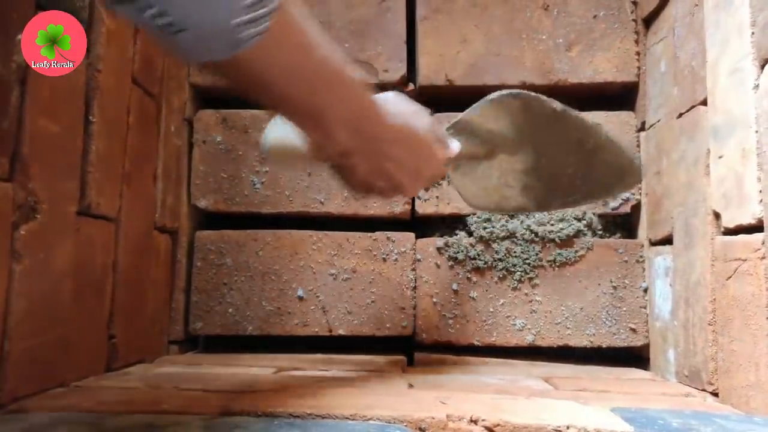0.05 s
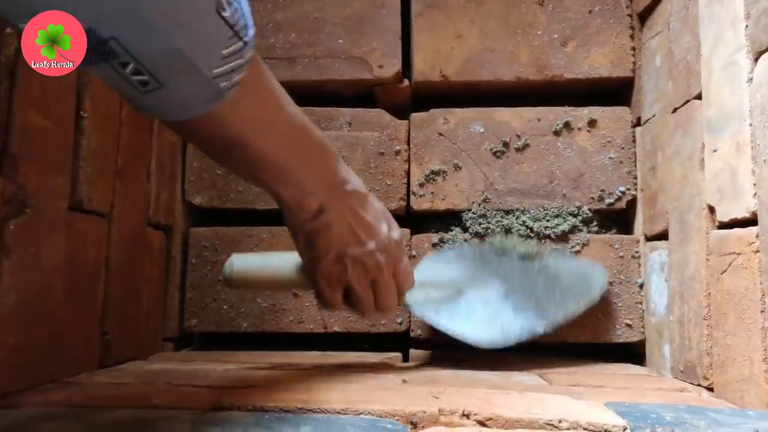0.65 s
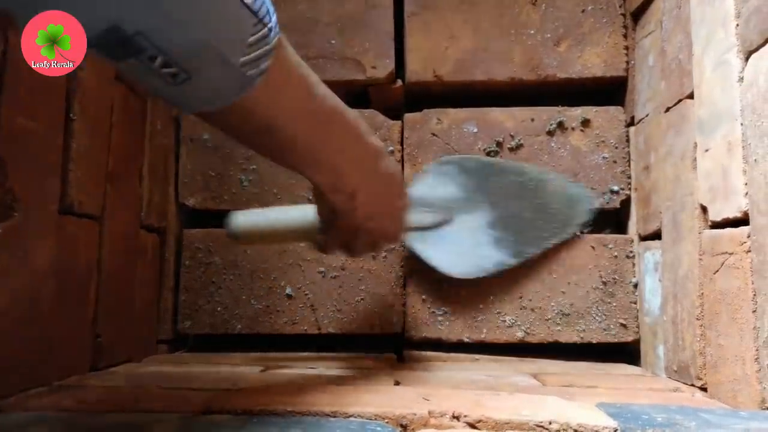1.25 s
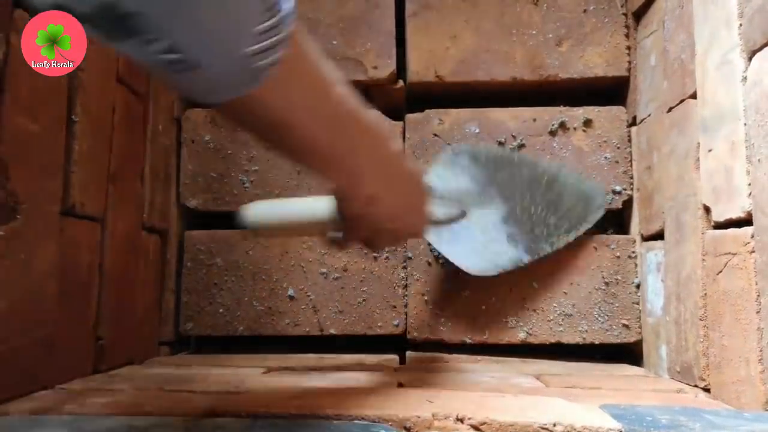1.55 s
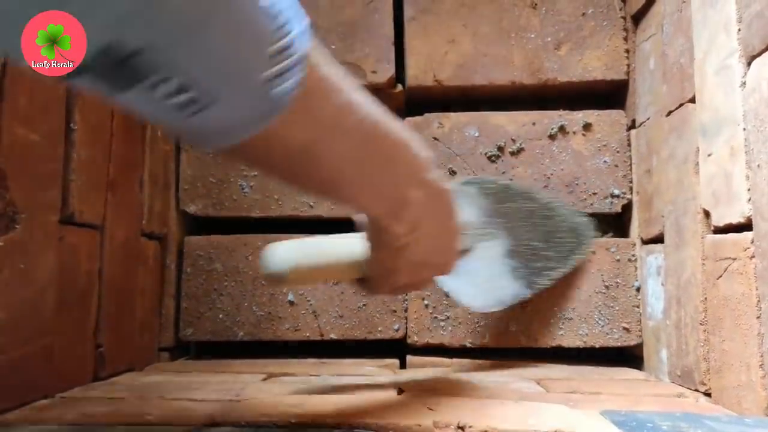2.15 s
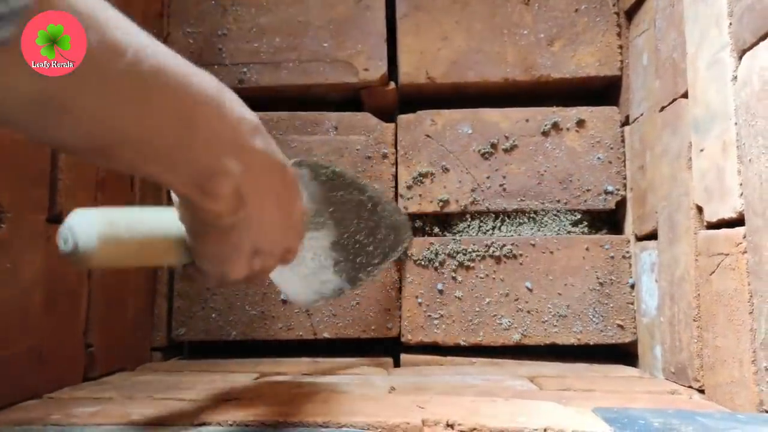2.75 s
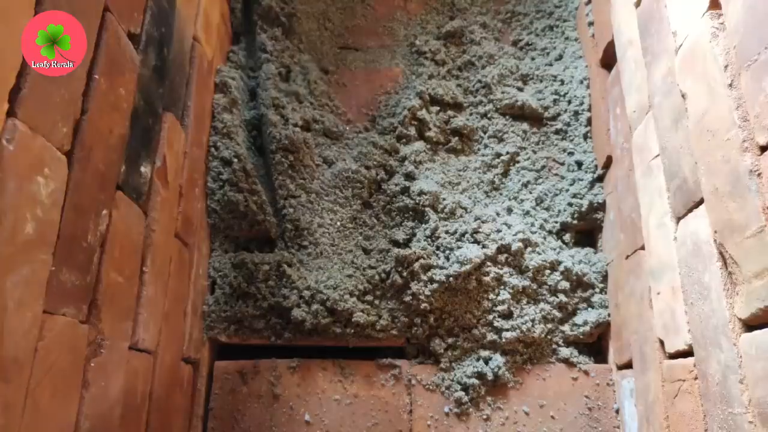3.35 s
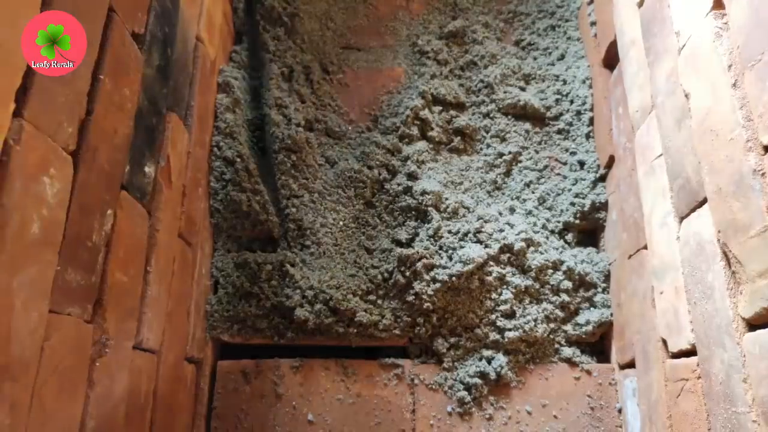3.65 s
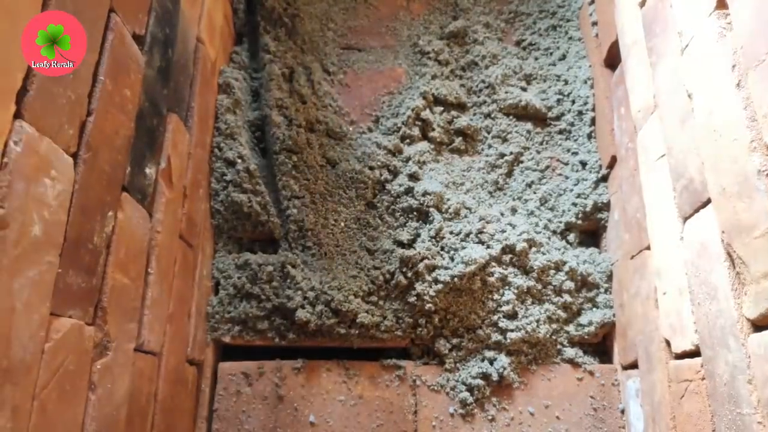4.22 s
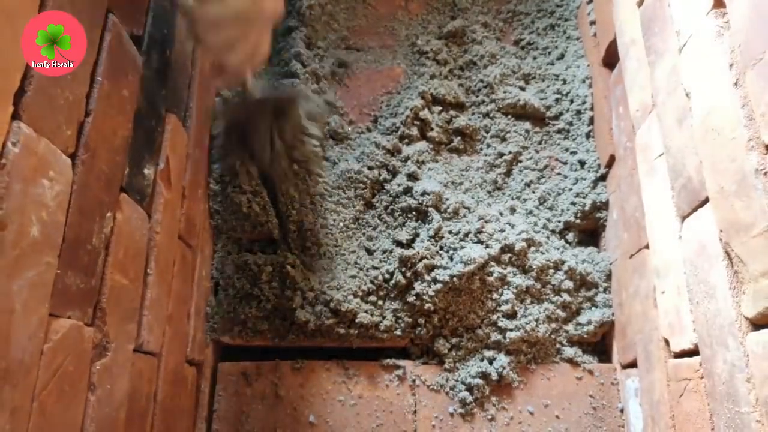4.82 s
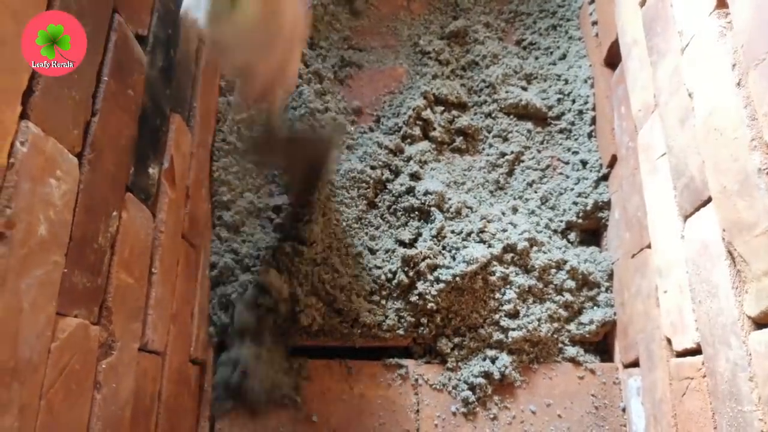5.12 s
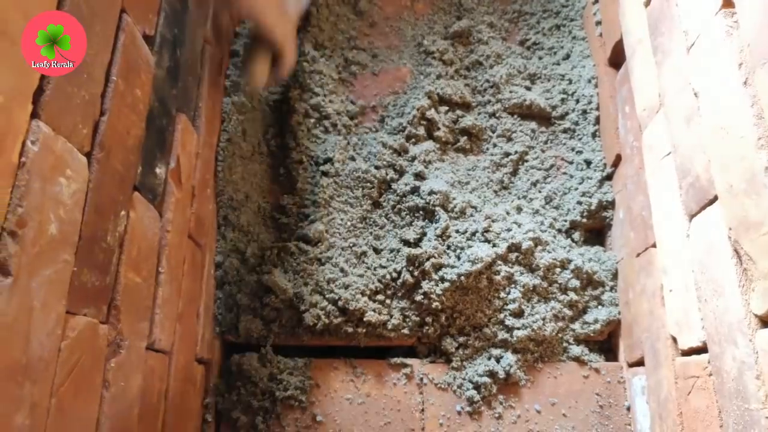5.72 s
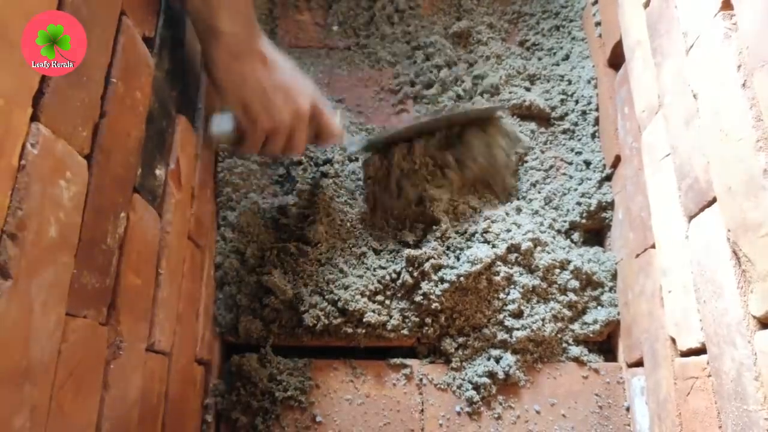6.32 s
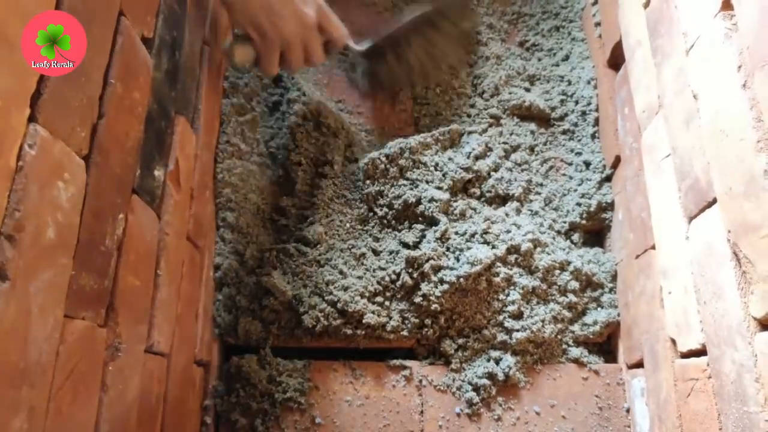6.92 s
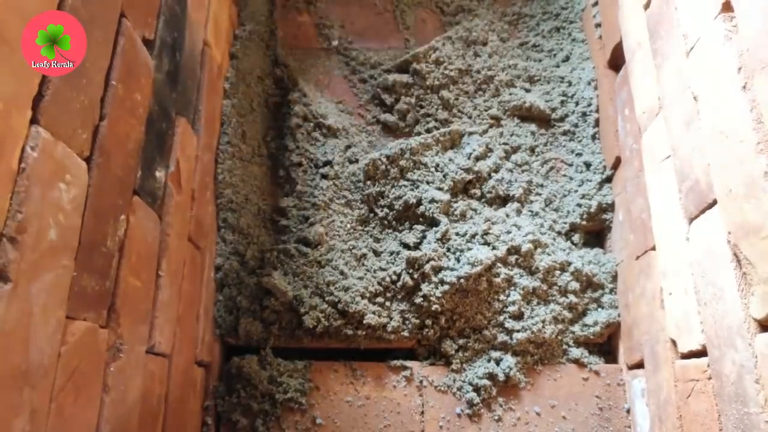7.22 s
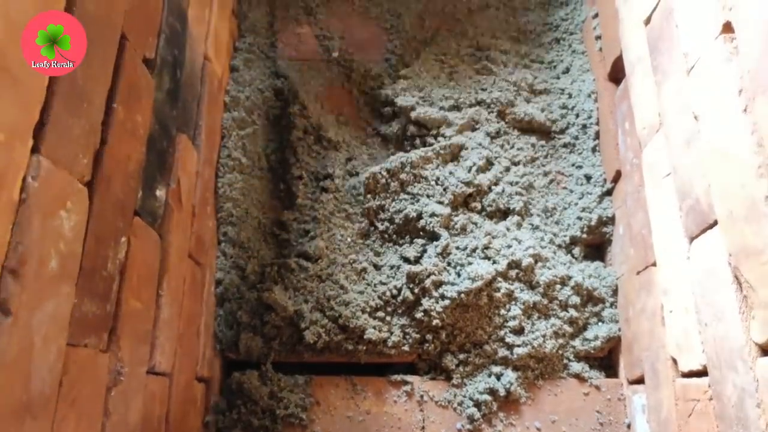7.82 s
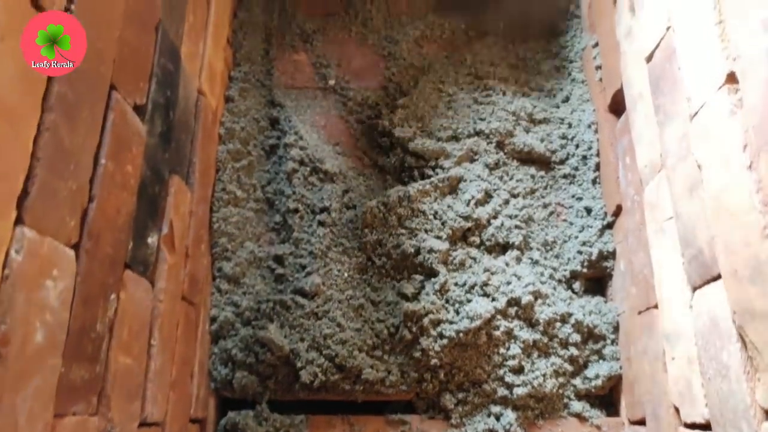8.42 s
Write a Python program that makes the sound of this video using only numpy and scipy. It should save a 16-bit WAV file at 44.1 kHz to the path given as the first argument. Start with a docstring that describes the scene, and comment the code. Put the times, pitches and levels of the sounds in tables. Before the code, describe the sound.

Short, gritty scrapes and ringing taps come from a steel trowel working sand over brick, close on the right. The sound cuts out briefly, then a scoop digs and pours damp sand with crunches, knocks and soft trickles. Tight brick walls add a very short echo. A hollow hum of moving air on the left dips under the loud strokes, while a thin whine and a few soft swishes sit behind the tools.

```python
"""At the bottom of a narrow brick shaft, with the tools close on the right of a stereo microphone. A steel
trowel scrapes and taps sand into the joints of the brick floor. After a short dead silence the scene changes: a
hand scoop digs into damp sand and pours it into the gap along the wall. Grains and knocks ring each blade, and
the walls add a short tail. On the left a low hum of moving air wavers, pressed down by a noise suppressor under
loud strokes; a thin whine and a few soft swishes lie behind the tools."""
import sys
import numpy as np
from scipy import signal
from scipy.fft import rfft, irfft
from scipy.io import wavfile
from scipy.ndimage import uniform_filter1d

SR = 44100
rng = np.random.default_rng(int(sys.argv[2]) if len(sys.argv) > 2 else 0)


def digitize_waveform(pressure):
    """Quantize a signal to 16-bit integers and store it at the path in sys.argv[1].

    Rows of a 2-D input are taken as channels; values are limited to [-1, 1].
    """
    field = np.atleast_2d(pressure).T
    bounded = np.clip(field, -1, 1)
    quanta = np.round(bounded * 32767).astype(np.int16)
    wavfile.write(sys.argv[1], SR, quanta)


N = 377937
TIME = np.arange(N) / SR
FREQ_HZ = np.arange(N // 2 + 1) * SR / N
RING_SAMPLES, LEAD_SAMPLES = 16384, 256  # a blade's response, and the margin ahead of its onset


def from_db(db):
    return 10 ** (np.asarray(db) / 20)


def unit_rms(x):
    return x / np.sqrt(np.mean(x ** 2) + 1e-20)


def in_time(rows):
    """Each column of a curve over time, read at every sample."""
    time_s, *columns = np.transpose(rows)
    return [np.interp(TIME, time_s, column) for column in columns]


def at_hz(colour, hz):
    """A spectrum read on a log-frequency axis."""
    knots_hz, levels_db = np.transpose(colour)
    return np.interp(np.log(hz + 1), np.log(knots_hz), levels_db)


def drift(rate_hz):
    """A smooth random wander, mostly slower than rate_hz; rms one."""
    return unit_rms(irfft(rfft(rng.standard_normal(N)) / (1 + (FREQ_HZ / rate_hz) ** 2), N))


def noise(colour):
    """Steady noise of a given colour; rms one."""
    return unit_rms(irfft(rfft(rng.standard_normal(N)) * from_db(at_hz(colour, FREQ_HZ)), N))


def running_power(x, window_s, lag_s):
    """Power averaged over a short window; a negative lag looks ahead."""
    power = np.abs(uniform_filter1d(x ** 2, int(window_s * SR) + 1))
    return np.interp(TIME - lag_s, TIME, power)


# Thin, high whine behind the tools: time_s, level_db
WHINE_LEVELS = [(0, -61.5), (1.2, -73), (3.3, -71), (4.25, -59), (4.4, -43.5), (5.7, -47.5), (6.4, -51),
                (6.55, -56.5), (7.15, -59), (7.8, -54.5), (8.57, -51.5)]
# Its bands: pitch_hz, width_hz, relative_db
WHINE_BANDS = [(2194, 110, -7.5), (4370, 80, -14), (8745, 170, -1)]
def whine(wander, swell_db):
    """Narrow noise bands about an octave apart: each swells and sinks, all waver together in pitch."""
    phase_per_hz = 2 * np.pi * np.cumsum(1 + wander * drift(2.8)) / SR
    bands = np.zeros(N)
    for pitch_hz, width_hz, relative_db in WHINE_BANDS:
        gain = from_db(relative_db + swell_db * drift(2))
        phase = pitch_hz * phase_per_hz
        bands += gain * unit_rms(drift(width_hz) * np.cos(phase) + drift(width_hz) * np.sin(phase))
    return from_db(in_time(WHINE_LEVELS)[0]) * bands


# Soft, hollow swishes in the background: middle_s, length_s, pitch_hz, level_db
SOFT_SWISHES = [(0.286, 0.11, 1070, -51.5), (2.152, 0.055, 1750, -45), (2.527, 0.1, 1660, -37.5),
                (2.882, 0.13, 1650, -43)]
def swishes(width):
    """Each is a band of noise that swells and fades."""
    out = np.zeros(N)
    for middle_s, length_s, pitch_hz, level_db in SOFT_SWISHES:
        edges_hz = [pitch_hz / (1 + width), pitch_hz * (1 + width)]
        band = signal.butter(2, edges_hz, "band", fs=SR, output="sos")
        swell = from_db(level_db) * np.exp(-2 * ((TIME - middle_s) / length_s) ** 2)
        out += swell * unit_rms(signal.sosfilt(band, rng.standard_normal(N)))
    return out


# Moving air at the microphone, ahead of the suppressor: time_s, hum_db, hiss_db
AIR_LEVELS = [(0.0, -40, -50), (.25, -36.5, -51.5), (.55, -41, -51), (1.1, -37.5, -51.5),
              (1.65, -39, -53.5), (2.0, -39.5, -52), (2.8, -40.5, -51.5), (3.35, -37, -49),
              (4.25, -36.5, -52), (4.42, -25.5, -42.5), (5.65, -27, -43.5), (5.9, -38, -47),
              (6.3, -39.5, -48.5), (6.6, -34, -47), (7.15, -40.5, -50.5), (7.95, -33, -46),
              (8.25, -38, -49.5), (8.57, -33, -48)]
# Its hollow hum, strongest near 195 Hz: frequency_hz, density_db
HUM_SPECTRUM = [(25, -39), (50, -37.5), (75, -20), (110, -18.5), (140, -11), (170, -1), (195, 6), (250, -9),
                (305, -3), (365, -16), (450, -9.5), (550, -22), (700, -44), (1200, -69.5)]
# Its faint hiss: frequency_hz, density_db
HISS_SPECTRUM = [(300, 1), (800, 9.5), (1200, 1), (2000, 0.5), (2600, -1), (3300, -3), (6500, -10.5),
                 (14000, -17.5)]
def moving_air(tools, open_db, shut_db, duck_above_db, duck_slope, waver_db, waver_hz):
    """Air heard through a suppressor: the nearby tools open up the hiss and press the hum down."""
    hum_db, hiss_db = in_time(AIR_LEVELS)
    excess = running_power(tools, window_s=.077, lag_s=-.012) / from_db(hum_db + duck_above_db) ** 2
    duck_db = duck_slope * 10 * np.log10(1 + excess)
    hum = from_db(hum_db - duck_db + waver_db * drift(waver_hz)) * noise(HUM_SPECTRUM)
    power = running_power(tools, window_s=.065, lag_s=.02)
    opened = power / (power + from_db(-46) ** 2)  # half open with the tools at -46 dB
    gate_db = shut_db + (open_db - shut_db) * opened
    return hum + from_db(hiss_db + gate_db) * noise(HISS_SPECTRUM)


def minimum_phase(gain):
    """The causal spectrum that has the given gain at each frequency."""
    cepstrum = irfft(np.log(gain))
    cepstrum[1:RING_SAMPLES // 2] *= 2
    cepstrum[RING_SAMPLES // 2 + 1:] = 0
    return np.exp(rfft(cepstrum))


def blade(colour, modes, shaft_db, shaft_t60_s, uneven_db, detune):
    """A blade's response to a click in one position: treble, middle and bass, each of unit energy."""
    hz, t = np.arange(RING_SAMPLES // 2 + 1) * SR / RING_SAMPLES, TIME[:RING_SAMPLES]
    treble_hz, bass_hz = 2000, 520
    # the point of contact favours some modes and bends their pitch a little
    resonance = 1
    for pitch_hz, width_hz, lift_db in modes:
        favour, bend = rng.standard_normal(2)
        offset = 2 * (hz - pitch_hz * (1 + detune * bend)) / width_hz
        resonance += from_db(lift_db + uneven_db * favour) ** 2 / (1 + offset ** 2)
    # crowded upper modes merge into humps and dips that change with position
    humps = np.interp(hz, np.linspace(0, SR / 2, 140), rng.standard_normal(140))
    ripple_db = uneven_db * humps * np.clip(hz / treble_hz, 0, 1)
    direct = minimum_phase(from_db(at_hz(colour, hz) + ripple_db) * np.sqrt(resonance))
    # the close walls send back a dense, short tail
    walls = rng.standard_normal(RING_SAMPLES) * from_db(-60 * t / shaft_t60_s) * (t > .002)
    response = direct * (1 + from_db(shaft_db) * rfft(walls) / np.linalg.norm(walls))
    treble, above_bass = [1 / (1 + (edge / (hz + 1)) ** 8) for edge in (treble_hz, bass_hz)]
    shares = treble, above_bass - treble, 1 - above_bass
    bands = [np.roll(irfft(response * share), LEAD_SAMPLES) for share in shares]
    return [band / np.linalg.norm(band) for band in bands]


def stroke_levels(strokes, attack_s):
    """Treble hiss, middle ring and bass rub in dB: a stroke sets in, swells or eases, then dies away."""
    release_db_per_s = [353, 326.5, 234]
    rustle_db = [-65.5, -70.5, -66.5]  # faint floor between strokes
    power = np.zeros((3, N))
    for start_s, length_s, *bands_db, swell_db in strokes:
        span = slice(int(start_s * SR), int((start_s + length_s + .5) * SR))
        t = TIME[span] - start_s
        attack = np.clip(t / attack_s, 0, 1)
        ramp_db = swell_db * (np.minimum(t / length_s, 1) - .5)
        fall_db = np.outer(release_db_per_s, np.maximum(t - length_s, 0))
        power[:, span] += (attack * from_db(np.array(bands_db)[:, None] + ramp_db - fall_db)) ** 2
    return 10 * np.log10(power + from_db(rustle_db)[:, None] ** 2)


def pebbles(per_s, decay_s):
    """Coarse grains crack one by one, each pinging briefly at a pitch of its own; rms one."""
    t = TIME[:1024]
    out = np.zeros(N + len(t))
    for when, pitch, size in rng.random((int(per_s * N / SR), 3)):
        pitch_hz, level_db = 2200 + 5600 * pitch, 12 * size ** 2
        at = int(when * N)
        out[at:at + len(t)] += from_db(level_db) * np.sin(2 * np.pi * pitch_hz * t) * np.exp(-t / decay_s)
    return unit_rms(out[:N])


def grit(hiss_db, crunch_db, snaps_per_s, spread_db, judder_db, judder_hz, pebble_db):
    """Fine sand rushes; a hard stroke also snaps coarse grains, bunched as the blade sticks and slips."""
    pressure = 1 / (1 + from_db(crunch_db - hiss_db) ** 2)
    sizes = from_db(spread_db * np.minimum(rng.exponential(1, N), 4)) * rng.choice([-1, 1], N)
    snaps = unit_rms(sizes * (rng.random(N) < snaps_per_s / SR))
    coarse = unit_rms(snaps + from_db(pebble_db) * pebbles(per_s=260, decay_s=.0018))
    sand = (rng.standard_normal(N) + pressure * coarse) / np.sqrt(1 + pressure ** 2)
    return unit_rms(sand * from_db(judder_db * pressure * drift(judder_hz)))


def blows(hits, gain_db, crack_s, crush_s, crush_db):
    """Forces in treble, middle and bass: the blade knocks once as grains under it crack and crumble."""
    forces, t = np.zeros((3, N + RING_SAMPLES)), TIME[:RING_SAMPLES]
    click = 1. * (t == 0)
    gain = from_db(gain_db) * np.sqrt(.01 * SR)  # a blow carries the energy of 10 ms at its level
    # sand cushions the knock, and a light blade gives little deep bass
    cushion = signal.butter(2, [130, 1400], "band", fs=SR, output="sos")
    for start_s, *levels_db in hits:
        crumbs = rng.standard_normal((2, RING_SAMPLES)) * np.exp(-t / np.array([[crack_s], [crush_s]]))
        crack, crush = crumbs / np.linalg.norm(crumbs, axis=1, keepdims=True)
        impact = click + from_db(crush_db) * crush
        knock = signal.sosfilt(cushion, impact / np.linalg.norm(impact) + 1e-18)
        at = round(start_s * SR)
        forces[:, at:at + RING_SAMPLES] += gain * from_db(levels_db)[:, None] * [crack, knock, knock]
    return forces[:, :N]


def sliding_blade(positions, levels_db, grains, forces, moves_per_s):
    """Scraping and blows drive one blade, whose ring shifts as it slides from position to position."""
    drives = [grains * from_db(db) + force for db, force in zip(levels_db, forces)]
    out = np.zeros(N)
    for k, responses in enumerate(positions):
        crossfade = np.clip(1 - abs((TIME * moves_per_s - k) % len(positions) - 1), 0, 1)
        for drive, response in zip(drives, responses):
            out += signal.oaconvolve(drive * crossfade, response)[LEAD_SAMPLES:LEAD_SAMPLES + N]
    return out


# Sand crushed under the trowel: frequency_hz, density_db
TROWEL_SPECTRUM = [(50, -27), (130, -9), (430, -3.5), (560, -11.5), (800, -3), (1150, -7), (2200, -3.5),
                   (3000, 1.5), (4300, -4.5), (5400, 0), (6400, -0.5), (7900, -6), (10500, -14),
                   (14000, -13)]
# Resonances of its steel blade: pitch_hz, width_hz, lift_db
TROWEL_RESONANCES = [(620, 40, 9.5), (681, 50, 23), (907, 46, 21.5), (986, 14, 25.5), (1396, 50, 20),
                     (1658, 17, 19.5), (1878, 22, 20), (2433, 25, 8.5), (2670, 40, 4), (3062, 35, 4.5),
                     (3517, 26, 4.5), (4020, 26, 13.5), (4470, 50, 7), (4616, 17, 10.5), (5060, 20, 5.5),
                     (5750, 60, 8.5), (6240, 160, 10), (6570, 70, 10.5), (7010, 50, 12.5)]
# Scrapes across the floor, close by: start_s, length_s, hiss_db, ring_db, rub_db, swell_db
TROWEL_SCRAPES = [(0.0, 0.049, -32.5, -40, -64, 1.5), (.333, .02, -41, -27, -38.5, -7.5),
                  (.412, 0.01, -27, -29.5, -52, 2.5), (.62, .1, -32, -32, -48, -0.5),
                  (.735, 0.043, -26, -33, -38.5, -5.5), (.928, 0.079, -29, -37.5, -52.5, -4),
                  (1.048, 0.066, -43.5, -43.5, -52, -5.5), (1.283, 0.043, -31, -31.5, -55.5, 4.5),
                  (1.33, .13, -22, -26.5, -59.5, -1), (1.435, 0.012, -38.5, -13, -32, -1),
                  (1.674, 0.066, -35.5, -34.5, -41.5, 4.5), (1.74, 0.14, -24.5, -31.5, -60, 0.5),
                  (1.905, 0.0093, -25.5, -37.5, -60.5, -2.5), (2.128, 0.032, -35, -32.5, -59, 6.5),
                  (2.19, .145, -24.5, -27, -59, 6), (2.335, 0.14, -24, -30.5, -48.5, -2.5),
                  (2.636, 0.034, -25.5, -29.5, -47, -1), (2.803, 0.011, -26.5, -23, -48, -7.5),
                  (3.17, 0.018, -53, -64, -70, -2.5), (3.325, .04, -49, -57.5, -68, -3.5)]
# The trowel meets brick or a coarse grain, ahead of gain_db: start_s, crack_db, knock_db, thud_db
TROWEL_TAPS = [(0.341, -41, -26, -42), (0.427, -22, -28, -54), (0.629, -30, -28, -52),
               (0.665, -17, -31, -49), (0.727, -28, -35, -48), (0.801, -30, -41, -60),
               (0.942, -24, -35, -54), (1.055, -44, -29, -39), (1.455, -22, -10.5, -34),
               (1.46, -18, -16, -44), (1.687, -23, -30, -44), (1.724, -22, -33, -51),
               (1.772, -18, -36, -56), (2.65, -25, -38, -49), (2.815, -29, -29, -47)]
def trowel():
    """A thin layer of sand is ground between steel and brick."""
    positions = [blade(TROWEL_SPECTRUM, TROWEL_RESONANCES, shaft_db=-6, shaft_t60_s=.046,
                       uneven_db=4.5, detune=.003) for _ in range(7)]
    levels_db = stroke_levels(TROWEL_SCRAPES, attack_s=.015)
    grains = grit(levels_db[0], crunch_db=-36.5, snaps_per_s=2000, spread_db=1,
                  judder_db=2.5, judder_hz=50, pebble_db=-4.5)
    forces = blows(TROWEL_TAPS, gain_db=2.5, crack_s=.0033, crush_s=.01, crush_db=-7.5)
    return sliding_blade(positions, levels_db, grains, forces, moves_per_s=9)


# Damp sand crushed under the scoop: frequency_hz, density_db
SCOOP_SPECTRUM = [(50, -29.5), (130, 0), (270, 0), (450, -4), (800, 4.5), (1800, 5), (2800, 2), (4200, 1.5),
                  (5300, 1.5), (5900, 13.5), (7050, 6.5), (7900, -3.5), (10500, -9.5), (14000, -6.5)]
# Resonances of its blade: pitch_hz, width_hz, lift_db
SCOOP_RESONANCES = [(384, 31, 11.3), (568, 85, 11.2), (662, 74, 13.3), (958, 82, 11.9), (1386, 145, 8.9),
                    (1646, 82, 6.2), (2360, 12, 1.3), (2575, 15.4, 9.2), (2960, 96, 4.3), (3410, 83, 2.9),
                    (4477, 31, 3.5), (4940, 18, 6), (6687, 79, 4.4)]
# Pushes into the heap, close by: start_s, length_s, hiss_db, ring_db, rub_db, swell_db
SCOOP_PUSHES = [(4.24, 0.084, -33, -40, -44, -1), (4.565, 0.12, -22, -30.5, -36, -2),
                (5.618, 0.057, -28, -29.5, -43, -14), (5.748, 0.28, -21, -32.5, -49.5, -12),
                (6.03, .125, -19, -32, -59, 14), (6.155, 0.098, -20.5, -26.5, -44.5, -5.5),
                (6.598, 0.17, -24, -34.5, -64, 7), (6.75, 0.16, -23.5, -31.5, -51.5, 1.5),
                (7.264, 0.04, -29, -35.5, -43.5, -1), (7.346, 0.05, -20.5, -27, -46, 1.5),
                (7.44, 0.028, -14, -19, -37.5, -6), (8.005, 0.057, -29.5, -32.5, -32, -11.5),
                (8.074, 0.16, -22, -24.5, -36, -11.5), (8.235, 0.066, -24.5, -29, -38.5, -3.5),
                (8.333, 0.097, -17.5, -23, -37, -8), (8.445, 0.043, -26.5, -38, -52, 9.5)]
# Loose sand trickles off by the wall: start_s, length_s, hiss_db, ring_db, rub_db, swell_db
SCOOP_POURS = [(4.3, 1.06, -42, -51.5, -51, -5), (4.89, 0.087, -39, -44.5, -50, -1),
               (5.11, 0.052, -30, -44.5, -58, 6.5), (5.18, 0.058, -40.5, -45, -33, -3),
               (5.335, 0.18, -28.5, -37, -48, 2), (5.53, 0.24, -35, -44, -62, 19.5),
               (6.25, 0.19, -43, -51.5, -59, -9), (7.46, 0.43, -45, -49.5, -71.5, -32.5)]
# The scoop meets brick or a pebble, ahead of gain_db: start_s, crack_db, knock_db, thud_db
SCOOP_KNOCKS = [(4.298, -23, -40, -44), (5.629, -19, -25, -39), (5.756, -14, -26, -62),
                (5.824, -23, -35, -58), (5.849, -18, -29, -55), (6.097, -13, -42, -65),
                (6.144, -15, -26, -66), (6.151, -19, -27, -57), (6.173, -17, -33, -44),
                (6.196, -18, -29, -44), (6.214, -19, -30, -58), (6.248, -21, -37, -50),
                (6.401, -34, -56, -67), (6.606, -21, -27, -49), (6.65, -21, -34, -39),
                (6.699, -24, -38, -63), (6.748, -20, -36, -62), (6.795, -16, -32, -44),
                (6.839, -13, -32, -50), (6.873, -18, -33, -42), (7.421, -18, -28, -50),
                (7.446, -19, -27, -49), (8.01, -26, -26, -25), (8.078, -17, -24, -38),
                (8.21, -23, -25, -35), (8.327, -17, -24, -31), (8.348, -17, -16, -28),
                (8.49, -17, -27, -50)]
def scoop():
    """Damp sand crunches as the scoop is pushed through the heap, and slides off with a soft hiss."""
    positions = [blade(SCOOP_SPECTRUM, SCOOP_RESONANCES, shaft_db=-5.5, shaft_t60_s=.026,
                       uneven_db=4, detune=.009) for _ in range(7)]
    pushes_db = stroke_levels(SCOOP_PUSHES, attack_s=.015)  # a push bites quickly
    pours_db = stroke_levels(SCOOP_POURS, attack_s=.042)  # a slide gathers slowly
    levels_db = np.maximum(pushes_db, pours_db)
    grains = grit(levels_db[0], crunch_db=-27, snaps_per_s=1000, spread_db=3,
                  judder_db=1.5, judder_hz=69.7, pebble_db=-3)
    forces = blows(SCOOP_KNOCKS, gain_db=2.5, crack_s=.0025, crush_s=.0071, crush_db=.5)
    return sliding_blade(positions, levels_db, grains, forces, moves_per_s=14)


# Two scenes played one after the other, trowel then scoop: start_s, end_s
WORK_SPANS = [(0, 3.372), (4.245, 8.6)]
def scene():
    """Air on the left; tools, whine and swishes on the right; the trowel scene, then silence, then the scoop
    scene."""
    fade_s = .006
    trowelling, scooping = [np.clip(np.minimum(TIME - start_s, end_s - TIME) / fade_s, 0, 1)
                            for start_s, end_s in WORK_SPANS]
    tools = trowelling * trowel() + scooping * scoop()
    background = whine(wander=.006, swell_db=4) + swishes(width=.11)
    air = moving_air(tools, open_db=-6.25, shut_db=-18.75, duck_above_db=11, duck_slope=.65,
                     waver_db=1.5, waver_hz=5.8)
    working = trowelling + scooping
    return np.array([working * air, working * background + tools])


def record(dry):
    """The recorder rounds the tallest peaks and cuts the top of the treble."""
    ceiling, cutoff_hz = .95, 14350
    rounded = dry / (1 + (dry / ceiling) ** 4) ** .25
    return signal.sosfilt(signal.ellip(10, .2, 70, cutoff_hz, fs=SR, output="sos"), rounded)


dry = scene()
out = record(dry)
digitize_waveform(out)
```